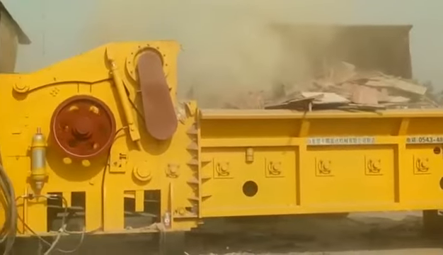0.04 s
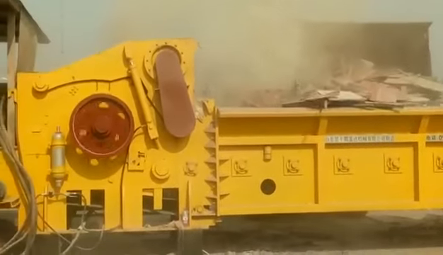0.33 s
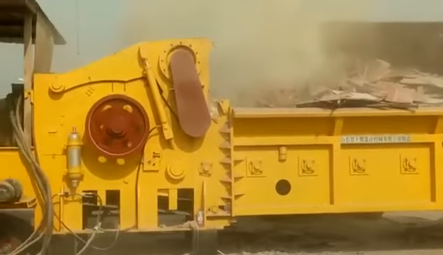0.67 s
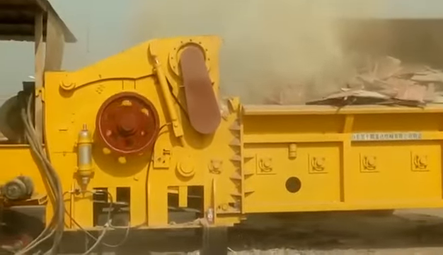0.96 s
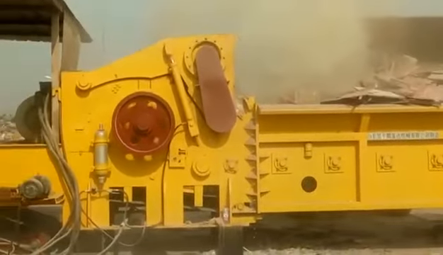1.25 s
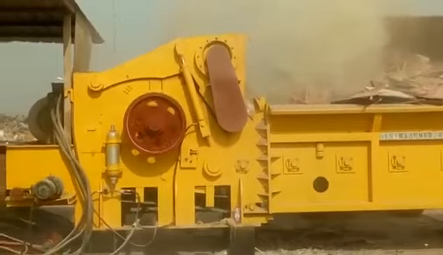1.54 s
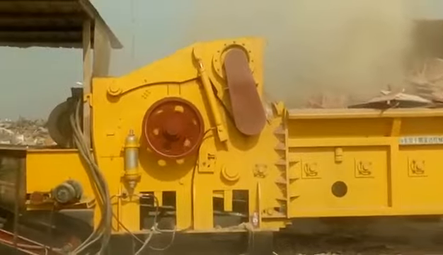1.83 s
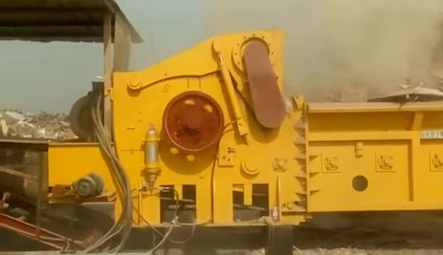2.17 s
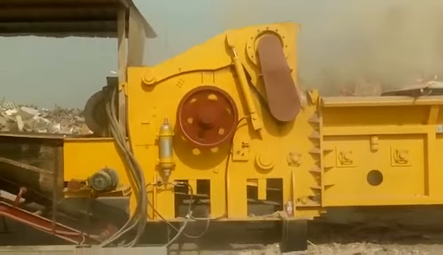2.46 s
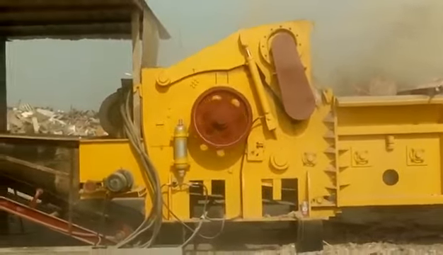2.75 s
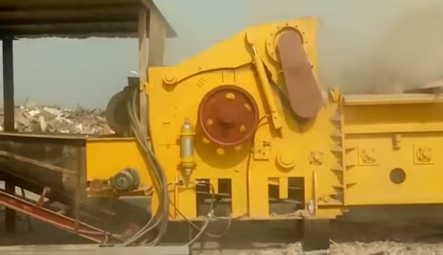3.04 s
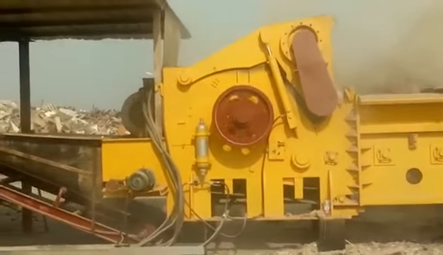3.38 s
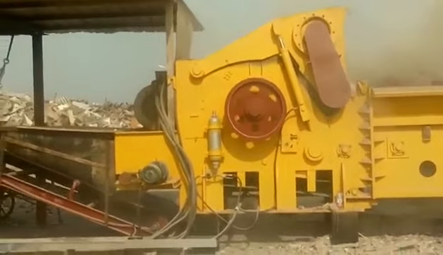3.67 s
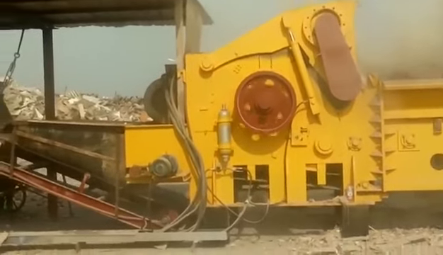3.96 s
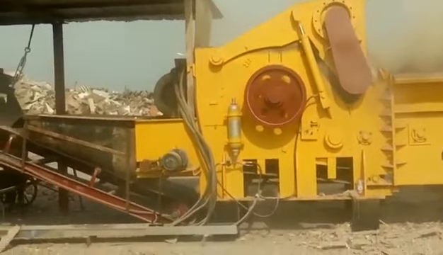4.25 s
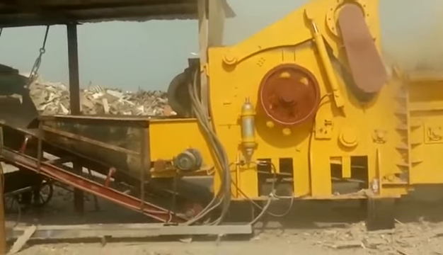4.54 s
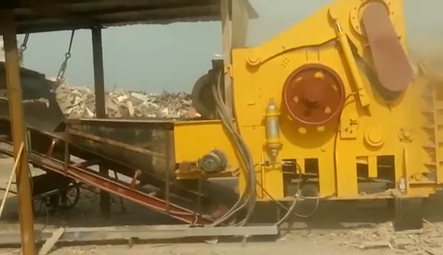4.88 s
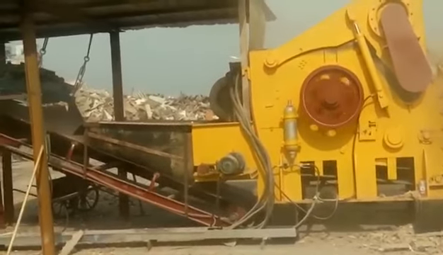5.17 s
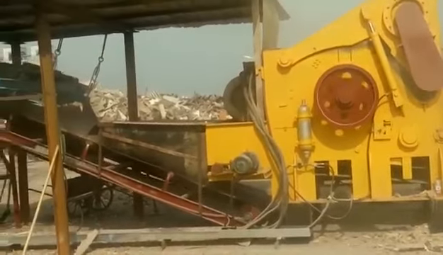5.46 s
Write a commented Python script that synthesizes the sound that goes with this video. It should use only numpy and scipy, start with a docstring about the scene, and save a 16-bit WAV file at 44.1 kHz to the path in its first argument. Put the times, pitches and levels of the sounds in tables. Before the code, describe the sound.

Dense hammering and crunching of wood in an industrial mill, with a low roar, hissing chips and metallic squeals, gradually growing louder.

```python
"""Hammer mill chewing scrap wood

A crusher works in an open yard, a few metres away, and grows louder as it fills. Hammers pound the same
pieces turn after turn, fibres splinter, and chips spray against the steel walls in quick surges.
Caught pieces scrape, groan and knock; the housing pings and squeals where wood strikes and rubs it.
Underneath, the rotor pumps out a drone and the drive whines. Both channels carry the same sound."""
import sys
import numpy as np
from scipy import signal
from scipy.fft import rfft, irfft, next_fast_len
from scipy.io import wavfile
from scipy.ndimage import uniform_filter1d, map_coordinates

SR = 44100
rng = np.random.default_rng(int(sys.argv[2]) if len(sys.argv) > 2 else 0)


def unload_wav(signal):
    """Save mono or channel-first audio to the path in sys.argv[1] as 16-bit WAV at rate SR, clipped to [-1, 1]."""
    wavfile.write(
        sys.argv[1],
        SR,
        np.round(np.clip(np.atleast_2d(signal).T, -1, 1) * 32767).astype(np.int16),
    )


N = 242991
ROTOR_HZ = 30.4  # turns a second
GRIP_S = .05  # time over which a caught piece is ground with even force


# Woody midrange of snapping fibres: (frequency [Hz], relative level [dB])
SPLINTER_EQ = [(200, -10.5), (480, -7), (630, -3.5), (770, 2), (900, 0.5), (1150, 0), (1750, -1.5),
               (2150, -2.5), (2450, -5), (3000, -7), (3500, -11.5), (4800, -22), (7000, -42), (12000, -57)]

def splintering(swing_db, feed_jolts):
    """Fibres snap in dense cracks; every passing board lends them its own short-lived resonances."""
    cracks = patchy(impacts(rate=14000, scatter_db=2.5), depth_db=2.5, width_hz=55, length=.09)
    level_db = -24 + .07 * clock() + swing_db
    crunch_db = .65 * feed_jolts + .5 * jolts(rate=85, decay=.018)
    return amp(level_db + crunch_db) * coloured(cracks, SPLINTER_EQ)


# Heavy low body of the hammer blows: (frequency [Hz], relative level [dB])
POUND_EQ = [(10, -26), (20, -15.5), (30, -21), (40, -18.5), (52, -32), (66, -6), (82, 1), (130, 3),
            (220, -1), (390, 0), (580, -5.5), (900, -6), (1800, -45), (4000, -70)]

def pounding(swing_db):
    """Hammers hit the wood; a share of the blows comes back one turn later on the same piece."""
    blows = each_turn(impacts(rate=5000, scatter_db=3), again=.31)
    level_db = -28 + .64 * clock() + swing_db  # builds as the mill fills
    jolt_db = .88 * jolts(rate=39, decay=.019)
    return amp(level_db + jolt_db) * evened(coloured(blows, POUND_EQ), 2 * GRIP_S)


# Bright sizzle of chips on steel: (frequency [Hz], relative level [dB])
CHIP_EQ = [(1200, -62), (3000, -7.5), (4000, -4), (5000, -5), (6000, -1.5), (7400, 0.5), (8600, -2),
           (10000, -4), (11000, -6.5), (11800, -14)]
# Handfuls of chips thrown at the walls: (time [s], level [dB], length [s])
CHIP_SURGES = [(0.18, -30, 0.016), (0.265, -28, 0.034), (.47, -28, .012), (.57, -30, .02),
               (1.065, -28, 0.025), (1.14, -28, 0.014), (1.835, -41, .015), (2.01, -31, .012),
               (2.167, -36, .012), (2.285, -29, .022), (2.524, -30, .025), (2.616, -27, 0.02),
               (2.686, -28, 0.021), (2.79, -32, .008), (3.124, -28, .022), (3.36, -30, 0.031),
               (3.486, -29, 0.03), (3.585, -29, 0.018), (3.67, -41, 0.017), (3.926, -26.5, 0.026),
               (4.022, -26, 0.0073), (4.088, -27.5, 0.022), (4.25, -30, 0.014), (4.317, -28, 0.025),
               (4.367, -28.5, 0.022), (4.435, -33, .012), (4.475, -24.5, 0.02), (4.627, -32, .008),
               (4.67, -29, 0.011), (4.833, -23.5, 0.0099), (4.998, -29, .014), (5.027, -29, .007),
               (5.074, -26, 0.0098), (5.39, -39, .02)]

def chips(swing_db, feed_jolts):
    """Fine chips hail steadily on the steel walls; coarser ones rattle in thrown handfuls."""
    level_db = -29 + .2751 * clock() + swing_db
    flutter_db = .7 * feed_jolts + .6 * jolts(rate=45, decay=.025)
    hail = coloured(impacts(rate=9000, scatter_db=4) + rng.standard_normal(N), CHIP_EQ)
    grit = coloured(impacts(rate=2400, scatter_db=2.5) + rng.standard_normal(N), CHIP_EQ)
    surges = sum(amp(db) * spurt(s, length) for s, db, length in CHIP_SURGES)
    return amp(level_db + flutter_db) * hail + surges * grit


# Pieces caught by the hammers, rumbling low or scraping high:
# (time [s], level [dB], pitch [Hz], length [s], width [share of pitch])
CAUGHT_PIECES = [(.595, -25, 190, .05, .35), (.69, -25, 215, .06, .35), (.75, -24.5, 460, .042, .35),
                 (2.015, -26.5, 300, 0.03, 0.6), (4.455, -23, 2200, 0.012, .28), (.165, -28, 800, .025, .2),
                 (.265, -33, 3700, .025, .3), (1.46, -30, 940, .06, .2), (2.56, -33, 1980, .07, .04),
                 (3.047, -25.5, 6100, 0.005, .08), (3.39, -29, 390, .1, .25), (3.485, -32, 4000, .025, .3),
                 (3.61, -24.3, 295, 0.045, .22), (3.635, -25.5, 440, .035, .22),
                 (3.59, -26.5, 736, .055, .3), (3.75, -27.5, 340, .04, .3), (3.77, -29, 740, .035, .2),
                 (3.94, -31.5, 2830, 0.057, 0.12), (4.09, -28, 400, .035, .4),
                 (4.095, -32.5, 4200, .018, .3), (4.325, -31.5, 4200, .025, .3),
                 (4.59, -30, 2500, 0.027, 0.22), (4.87, -27, 270, .045, .3), (5.01, -32, 2500, .035, 0.15),
                 (5.24, -28, 260, .04, .3), (5.32, -27, 480, 0.06, 0.5)]

def scrapes():
    """Each piece shakes one resonance; struck turn after turn, long low ones growl at the rotor's rate."""
    out = np.zeros(N)
    for s, db, hz, length, spread in CAUGHT_PIECES:
        shaking = each_turn(ringing(hz, spread * hz), again=.8)
        out += amp(db) * swell(s, length) * evened(shaking, GRIP_S)
    return out


# Jammed pieces ringing on a board or a steel plate:
# (time [s], level [dB], pitch [Hz], length [s], glide [Hz/s])
JAMS = [(.635, -21, 152, .04, 0), (.69, -26, 212, .06, 0), (1.37, -28.5, 870, .035, 0),
        (1.52, -28, 845, .12, 0), (2.39, -26, 111, .042, 0), (3.23, -29, 120, .05, 0),
        (3.36, -27.5, 380, .035, 0), (3.83, -27.5, 140, .045, 0), (.35, -31, 2010, .03, 900),
        (.92, -34, 1970, .05, 1100), (1.045, -29, 2085, .045, -600), (2.33, -31, 2055, .05, -900),
        (2.38, -34, 1780, .07, -400), (2.48, -30, 1930, .04, -400), (5.01, -29, 2526, .04, 0)]

def groans():
    """Jammed pieces ring while the hammers work on them; some slide in pitch as they shift."""
    return sum(amp(db) * swell(s, length) * tone(hz + glide * (clock() - s), waver_hz=4)
               for s, db, hz, length, glide in JAMS)


# Hammer hits on thick blocks: (time [s], relative level [dB], pitch [Hz], rise time [s])
BLOCK_HITS = [(0.722, -27, 322, 0.0055), (.87, -22, 135, 0.0073), (1.031, -20, 307, 0.006),
              (1.482, -25, 320, 0.0045), (1.586, -23.5, 123, 0.012), (1.985, -24, 215, 0.0063),
              (2.027, -19.5, 412, 0.0054), (2.044, -25, 238, 0.0044), (2.206, -24, 111, 0.0086),
              (2.655, -19, 386, 0.0059), (2.686, -22, 328, .006), (3.564, -22, 324, 0.0046),
              (3.613, -23, 288, 0.0075), (4.083, -23, 392, 0.0063), (4.099, -22, 115, 0.0091),
              (4.113, -18, 322, 0.0021), (4.295, -22, 135, 0.0082), (4.494, -23.5, 136, 0.0071),
              (5.22, -26, 285, 0.008), (5.27, -24, 108, 0.008), (5.35, -26, 313, 0.0049)]
# Modes of a wooden block: (frequency [multiple of pitch], relative level [dB])
BLOCK_MODES = [(1, -1), (.58, -6), (1.37, -7), (2.1, -8)]

def knocks(gain_db=1.5):
    """Each block takes a sudden blow and rings for a few cycles."""
    out = np.zeros(N + SR)
    t = np.arange(SR // 8) / SR
    for s, db, hz, rise in BLOCK_HITS:
        ring = sum(amp(mode_db) * np.sin(2 * np.pi * (ratio * hz * t + rng.random()))
                   for ratio, mode_db in BLOCK_MODES)
        envelope = t / rise * np.exp(1 - t / rise)
        out[round(s * SR):][:len(t)] += amp(db + gain_db) * envelope * ring
    return out[:N]


# Drone of air pushed by the hammers: (harmonic [multiple of rotor speed], relative level [dB])
DRONE_HARMONICS = [(2, -42), (4, -50), (5, -43), (6, -41), (7, -45.5), (8, -52), (9, -40.5), (10, -39),
                   (11, -49.5), (13, -42.5), (18, -67), (19, -56)]
# Growl of the rotor under load: (harmonic [multiple of rotor speed], level [dB])
GROWL_HARMONICS = [(8, -34), (10, -30.5), (12, -33), (14, -38)]

def rotor(swing_db):
    """Rows of hammers pump air in uneven lumps, and growl once as they bite into a thick wad."""
    speed_hz = ROTOR_HZ * (1 + .0019 * wobble(rate=2.985))
    turns = np.cumsum(speed_hz) / SR
    phases = rng.random(24)
    harmonic = lambda k: np.sin(2 * np.pi * (k * turns + phases[round(k)]))
    drone = sum(amp(db - .5 + 3 * wobble(rate=9)) * harmonic(k) for k, db in DRONE_HARMONICS)
    growl = sum(amp(db + 3 * wobble(rate=16)) * harmonic(k) for k, db in GROWL_HARMONICS)
    return amp(swing_db) * (drone + swell(s=3.4, length=.2) * growl)


# Modes of the steel shell: (pitch [Hz], width [Hz], relative level [dB])
HOUSING_MODES = [(2182, 28, -8), (2180, 160, -6)]
# Blows that ping the shell: (time [s], level [dB])
HOUSING_PINGS = [(.012, -35), (.04, -30), (.232, -23.5), (.331, -36), (.372, -40), (.428, -37), (.498, -36),
                 (.575, -28), (.923, -29), (1.156, -26), (1.342, -31), (1.594, -27), (2.796, -26),
                 (2.897, -30), (3.254, -27), (4.67, -27), (5.037, -23), (5.342, -28), (5.48, -25)]
# Boards squealing along the shell: (time [s], level [dB], length [s])
HOUSING_SQUEALS = [(.04, -32, .05), (.35, -32.5, .05), (.52, -33.5, .06), (.76, -35.5, .04),
                   (.95, -34, .08), (1.33, -31.5, .05), (1.65, -32, .06), (1.8, -30, .06),
                   (2.59, -28.5, .065), (2.85, -29.5, .1), (3.27, -34, .05)]

def housing():
    """The steel shell sings throughout, pings where wood strikes it and squeals where wood rubs."""
    shimmer = amp(2.7 * jolts(rate=100, decay=.012))
    modes = sum(amp(db) * ringing(hz, width) for hz, width, db in HOUSING_MODES)
    singing = amp(-36 + .16 * clock()) * unit(shimmer * modes)
    ring = tone(hz=2183, waver_hz=11)
    rasp = amp(-13) * ringing(centre_hz=2060, width_hz=110)
    pings = sum(amp(db) * spurt(s, length=.016) for s, db in HOUSING_PINGS)
    chatter = amp(3.5 * wobble(rate=70))  # rubbing wood slips in a stutter
    squeals = chatter * sum(amp(db) * swell(s, length) for s, db, length in HOUSING_SQUEALS)
    return singing + (pings + squeals) * (ring + rasp)


# Whine of the drive and its bearings: (pitch [Hz], width [Hz], relative level [dB])
DRIVE_WHINES = [(687, 3, -49), (724, 3, -47), (1601, 18, -44), (1922, 8, -42.5), (2035, 70, -41),
                (2526, 12, -46), (2979, 6, -52)]

def drive(gain_db=2):
    """The drive and its bearings lay a steady bed of narrow whines behind the crushing."""
    return amp(gain_db) * sum(amp(db) * ringing(hz, width) for hz, width, db in DRIVE_WHINES)


# Wads of wood (+) and gaps (-) in the feed:
# (time [s], length [s], pounding change [dB], splintering change [dB], chips change [dB])
WADS_AND_GAPS = [(0.054, 0.09, -4.5, -1.5, 0), (0.29, 0.06, 3, 1.3, -0.2), (0.486, 0.17, 2.5, -2.2, 0.4),
                 (0.657, 0.075, 2, -1, -0.5), (0.895, 0.065, -1.5, -1.5, 0.5), (1.47, 0.078, 2, 0.5, 1),
                 (1.96, 0.033, -1, 0.2, -3), (2.12, 0.028, -2, -2.5, -2), (2.43, .05, -1, -1, -1),
                 (2.706, 0.036, 0.5, 1.5, .3), (2.994, 0.13, 0, -1.7, -.5), (3.53, 0.35, 0.4, 0.6, 0.1),
                 (3.91, 0.066, -3, -0.5, 0), (4.173, 0.078, 1, -2, -1.3), (5.33, 0.39, 1.5, -0.3, -.2)]

def feed_swings():
    """Each wad or gap rides the levels of pounding, splintering and chips: three curves in dB."""
    return sum(np.outer(changes_db, swell(s, length)) for s, length, *changes_db in WADS_AND_GAPS)


def amp(db):
    """Decibels to gain."""
    return 10 ** (np.asarray(db) / 20)


def unit(x):
    """x at rms 1."""
    return x / np.sqrt(np.mean(x ** 2) + 1e-20)


def clock():
    """The time of every sample, in seconds."""
    return np.arange(N) / SR


def swell(s, length):
    """A soft envelope around time s that rises faster than it falls."""
    u = (clock() - s) / length
    return np.exp(-(u * np.where(u < 0, 1.3, .8)) ** 2)


def spurt(s, length):
    """An envelope around time s with a sharp attack and a trailing release."""
    u = (clock() - s) / length + .4
    return np.exp(-(u * np.where(u < 0, 3, .6)) ** 2)


def wobble(rate):
    """A smooth random curve of rms 1, rate knots a second."""
    return unit(map_coordinates(rng.standard_normal(1024), [clock() * rate + 2], mode="wrap"))


def jolts(rate, decay):
    """A random curve of rms 1 that jumps up rate times a second and sinks back over decay seconds."""
    kicks = (rng.random(N) < rate / SR) * rng.uniform(.5, 1, N)
    sinking = filtered(kicks - kicks.mean(), lambda hz: 1 / (1 + 2j * np.pi * hz * decay))
    return unit(sinking - uniform_filter1d(sinking, size=SR // 5))


def impacts(rate, scatter_db):
    """Random tiny blows of scattered size, rate a second, at rms 1."""
    struck = rng.random(N) < rate / SR
    return unit(struck * rng.choice([-1, 1], N) * amp(scatter_db * rng.standard_normal(N)))


def ringing(centre_hz, width_hz):
    """A resonance shaken at random, at rms 1."""
    return unit(filtered(rng.standard_normal(N), lambda hz: 1 / (1 + ((hz - centre_hz) / width_hz) ** 2)))


def tone(hz, waver_hz):
    """A sine of height 1 whose pitch wavers a little."""
    cycles = np.cumsum(hz + waver_hz * wobble(rate=40)) / SR
    return np.sin(2 * np.pi * (cycles + rng.random()))


def filtered(x, response):
    """x through a filter whose gain is response(hz)."""
    size = next_fast_len(N + SR // 2)
    return irfft(rfft(x, size) * response(np.fft.rfftfreq(size, 1 / SR)), size)[..., :N]


def coloured(x, eq):
    """x through an EQ curve of (frequency [Hz], relative level [dB]) points, at rms 1."""
    points_hz, db = np.transpose(eq)
    return unit(filtered(x, lambda hz: amp(np.interp(np.log(hz + 1), np.log(points_hz), db))))


def patchy(x, depth_db, width_hz, length):
    """x with patches of random gain, width_hz wide and length seconds long, at rms 1."""
    size, hop = 2048, 512
    spectra = signal.stft(x, nperseg=size, noverlap=size - hop)[2]
    band, frame = np.indices(spectra.shape)
    where = [band * SR / size / width_hz, frame * hop / SR / length]
    patches = map_coordinates(rng.standard_normal((512, 256)), where, mode="wrap")
    return unit(signal.istft(spectra * amp(depth_db * patches), nperseg=size, noverlap=size - hop)[1][:N])


def each_turn(x, again, fade_hz=900):
    """A feedback delay one rotor turn long: the share again of the lows comes back; at rms 1."""
    share = lambda hz: again / (1 + (hz / fade_hz) ** 4)
    return unit(filtered(x, lambda hz: 1 / (1 - share(hz) * np.exp(-2j * np.pi * hz / ROTOR_HZ))))


def evened(x, length):
    """x levelled to rms 1 over stretches of length seconds."""
    window = np.hanning(round(2 * length * SR))
    power = np.abs(signal.fftconvolve(x ** 2, window, "same"))
    return unit(x / np.sqrt(power + 1e-12))


def scene():
    """The full mill in mono; the uneven feed jolts splintering and chips together."""
    pound_db, splinter_db, chips_db = feed_swings()
    feed_jolts = jolts(rate=43, decay=.026)
    mill = rotor(.26 * pound_db)  # the drone gently follows the pounding's swings
    mill += pounding(pound_db) + splintering(splinter_db, feed_jolts)
    mill += housing() + drive()
    mill += scrapes() + groans() + knocks() + chips(chips_db, feed_jolts)
    return np.array([mill, mill])


def record(dry):
    """A soft clip rounds off the highest peaks, then a steep low-pass cuts the top treble."""
    ceiling, top_hz = .45, 11700
    rounded = dry / (1 + np.abs(dry / ceiling) ** 10) ** (1 / 10)
    return filtered(rounded, lambda hz: hz < top_hz)


dry = scene()
out = record(dry)
unload_wav(out)
```